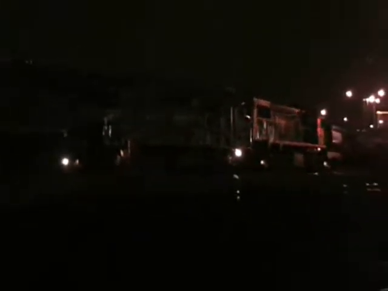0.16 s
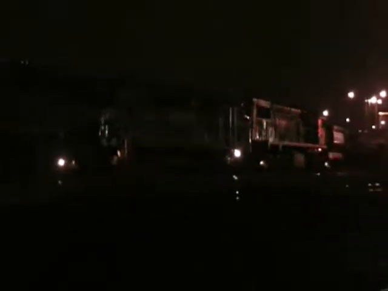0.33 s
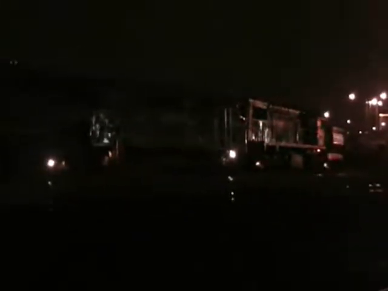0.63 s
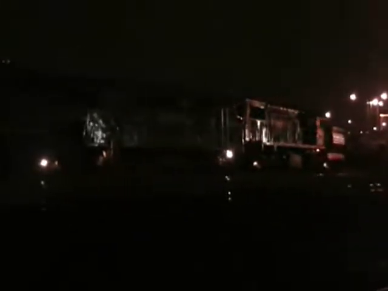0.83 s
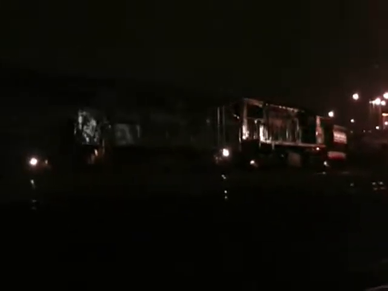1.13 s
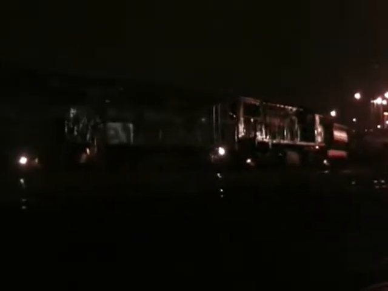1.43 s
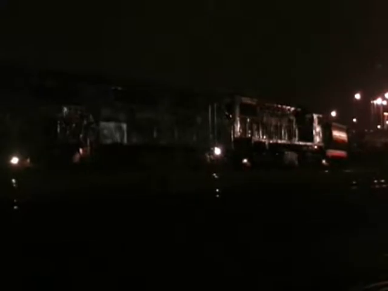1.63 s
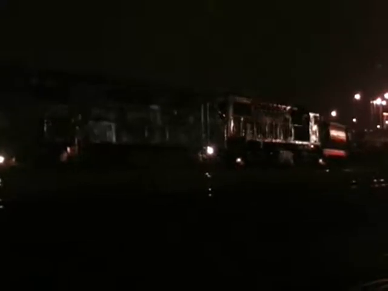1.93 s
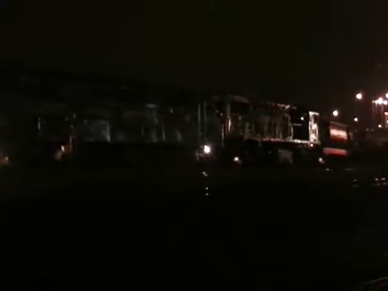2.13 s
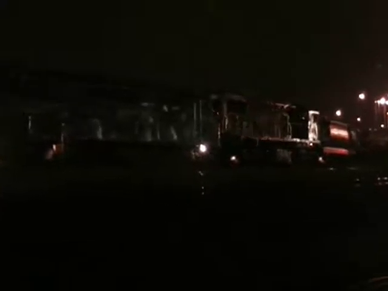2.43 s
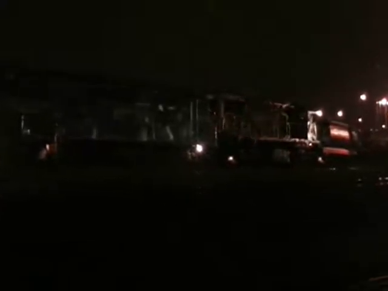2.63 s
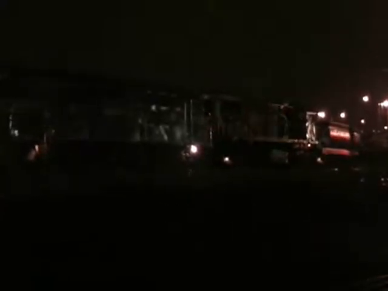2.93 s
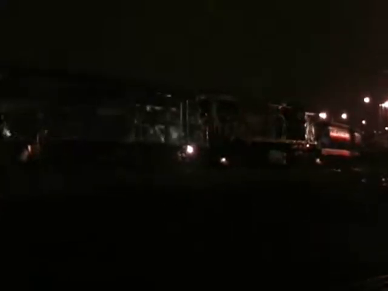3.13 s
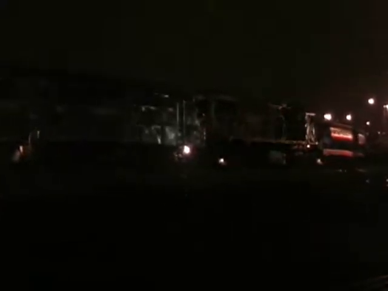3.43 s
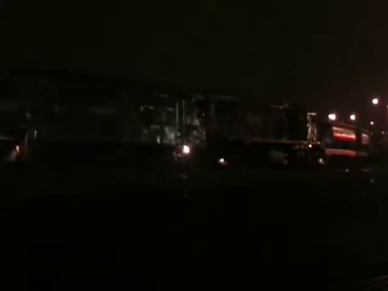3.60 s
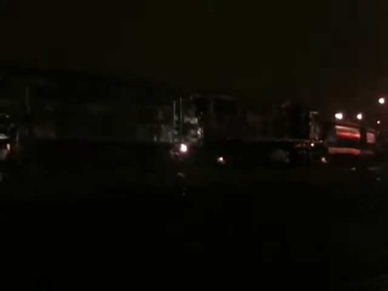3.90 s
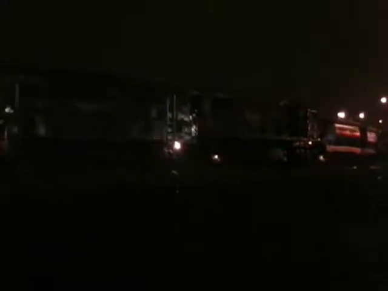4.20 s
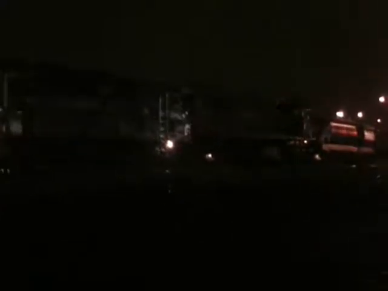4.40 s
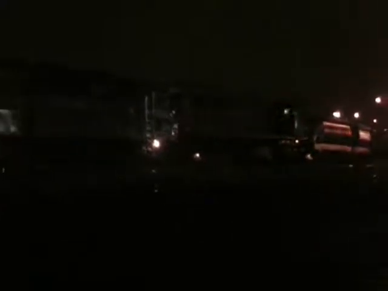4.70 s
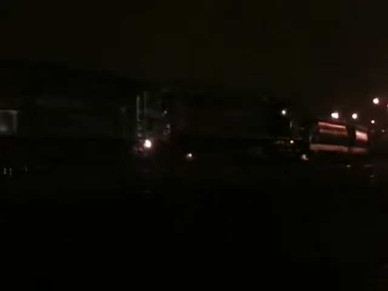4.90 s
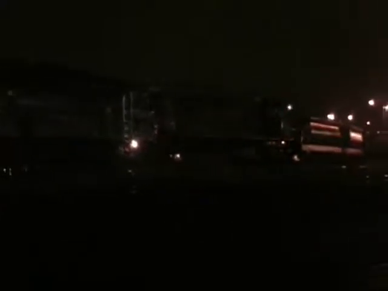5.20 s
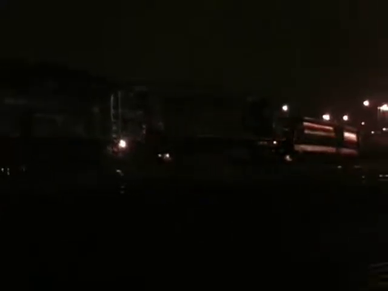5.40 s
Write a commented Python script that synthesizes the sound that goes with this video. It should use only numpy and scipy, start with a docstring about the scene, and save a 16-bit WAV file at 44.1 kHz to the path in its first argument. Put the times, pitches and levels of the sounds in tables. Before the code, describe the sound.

Two diesel locomotives idle then throttle up in a night yard, with rushing air hiss, rolling rumble and brief thin wheel squeals late on.

```python
"""A rail yard, where a freight train rolls slowly past two close microphone ports.
Two diesels idle, then speed up, the far one peaking first; both are sums of tones locked to a turning shaft.
The far one hums and whines; the near one throbs with pulses through a pipe, and its blower whistles.
Coloured noise makes the wheel rumble, the roar, the air hiss and the flange scrapes.
Short squeals are wheel rings driven by uneven slips."""
import sys
import numpy as np
from scipy import signal
from scipy.fft import rfft, irfft
from scipy.io import wavfile
from scipy.ndimage import uniform_filter1d

SR = 44100
rng = np.random.default_rng(int(sys.argv[2]) if len(sys.argv) > 2 else 0)


def inscribe(sig):
    """Save sig as 16-bit PCM at rate SR to the path in sys.argv[1].

    A 1-D sig is mono; a 2-D sig holds one channel per row.
    Samples are clipped to [-1, 1] before scaling.
    """
    pcm = np.round(np.clip(np.atleast_2d(sig).T, -1, 1) * 32767)
    wavfile.write(sys.argv[1], SR, pcm.astype(np.int16))


N = 244755
TIME = np.arange(N) / SR
HZ = np.fft.rfftfreq(N, 1 / SR)

# rolling rumble, and the roar of fans and engines: (frequency [Hz], relative level [dB])
RUMBLE_COLOUR = [(20, -39), (32, -20), (39, 0), (46, -3.5), (70, 3), (120, 0), (180, -2), (260, -0.5),
                 (350, -3), (450, -3.5), (560, -2), (700, -0.5), (850, -4.5), (1100, -11.5), (1800, -41.5),
                 (6000, -71)]
ROAR_COLOUR = [(500, -26.5), (800, -8.5), (1020, -1), (1200, -0.5), (1450, -4), (1720, -1.5), (2050, -3),
               (2500, -7.5), (3100, -10), (4000, -16), (6000, -25), (7600, -33.5), (9000, -29.5),
               (11000, -46)]
# the rumble grows a little as the train pulls
RUMBLE_DB, RUMBLE_PULL_DB = -19.5, 1.34
PULL_FROM_S, PULL_TO_S = 3.0, 3.4
# the roar grows, then eases
ROAR_IDLE_DB, ROAR_PEAK_DB, ROAR_SETTLED_DB = -26, -19.4, -21.5
ROAR_FROM_S, ROAR_TO_S, EASE_FROM_S, EASE_TO_S = 1.15, 2.6, 2.9, 3.35

# air hiss, and the faint fizz above it: (frequency [Hz], relative level [dB])
HISS_COLOUR = [(1500, -33), (2600, -12), (3300, 0), (4200, 3), (4800, 4), (5300, 1.5), (6000, -6.5),
               (6800, -14.5), (7600, -27), (8500, -20), (9400, -34.5), (10200, -47.5), (11000, -48)]
FIZZ_COLOUR = [(5500, -37), (7000, -5), (7600, -9), (8300, 0), (9400, -9.5), (10500, -23)]
HISS_IDLE_DB, HISS_LOADED_DB = -38, -33.5
FIZZ_IDLE_DB, FIZZ_LOADED_DB = -61.5, -52
# blasts of air on top of the hiss: (start [s], end [s], level [dB])
AIR_BLASTS = [(1.75, 2.02, -38), (2.017, 2.16, -30.5), (2.162, 2.271, -23.5), (2.27, 2.493, -26.5),
              (2.493, 3.064, -22.5), (3.06, 3.88, -31)]
VALVE_S = .045  # time a valve takes to open or close

# flange scrape colour: (frequency [Hz], relative level [dB])
SCRAPE_COLOUR = [(1200, -35), (2200, -1.5), (2850, -1), (3100, -1.5), (3350, 1), (3600, -5.5), (4200, -4.5),
                 (4700, -4.5), (5300, -7.5), (5800, -11.5), (6500, -16.5), (8500, -20), (10500, -35)]
# flange scrapes: (middle [s], length [s], level [dB])
SCRAPES = [(.69, 0.077, -35), (1.05, .08, -38), (1.5, .11, -34.5), (2.24, 0.19, -28), (3.437, 0.075, -28),
           (3.571, 0.11, -23.5), (4.31, 0.12, -28), (4.394, 0.041, -29.5), (4.495, 0.076, -25),
           (4.583, 0.079, -22.5), (4.668, 0.04, -24.5), (4.758, 0.075, -27.5), (4.878, 0.12, -25.5),
           (4.982, 0.11, -32.5), (5.107, 0.13, -28.5), (5.232, 0.13, -28), (5.46, 0.18, -29.5)]
# wheel squeals: (start [s], length [s], pitch at the bite [Hz], level [dB])
SQUEALS = [(4.264, 0.12, 3180, -31), (4.464, .06, 3385, -28.5), (4.558, .07, 3340, -24),
           (4.728, .065, 3260, -27.5), (4.823, .05, 3390, -29), (4.872, .06, 3110, -26.5),
           (4.93, .12, 3200, -29), (5.073, 0.12, 3180, -27.5), (5.195, .035, 3140, -31),
           (5.258, .04, 3320, -32), (5.387, .16, 3090, -31.5)]
# rings of the squealing wheel: (multiple of the squeal's pitch [ratio], level [dB])
WHEEL_RINGS = [(1, -.5), (1.33, -9), (1.62, -13), (1.95, -18)]
SQUEAL_HZ, SAG_S, BITE_S = 3125, .04, .008  # resting pitch, time to glide to it, attack
SLIP_HZ = 130  # how fast the slips vary

# governors: (idle, peak, settled [cycles/s], climb from, climb to, settle from, settle to [s])
FAR_GOVERNOR = (5.342, 6.9, 6.615, 1.83, 3.33, 3.5, 4.7)
NEAR_GOVERNOR = (5.11, 6.17, 6.06, 1.88, 4.9, 5.05, 5.8)
# the near engine takes up its load
IDLE_LOAD, FULL_LOAD = 0.069, 0.97  # share of the loaded pipe sound, 0-1
LOAD_FROM_S, LOAD_TO_S = 2.55, 3.05

# far engine's hum: (multiple of the cycle rate [ratio])
FAR_HUM = [16, 24, 40]
# far engine's gear whine: (multiple of the cycle rate [ratio]), then (level [dB]) for each
GEAR_ORDERS = [158, 190.4, 236.8, 277, 317]
GEAR_DB = [-3.5, -10, -1.5, -9, -6.5]
# the car body booms as the hum climbs through its resonances: (frequency [Hz], gain [dB])
BODY = [(85, -7), (115, -8), (128, 0), (136, -7), (160, -10), (212, -5), (223, 2), (237, 2), (255, -6)]
# the engine hood muffles and rings as the gear tones climb past: (frequency [Hz], gain [dB])
HOOD = [(800, -2), (845, 1), (875, 5), (920, 4), (985, 2.5), (1030, 3.5), (1060, 1), (1085, -5), (1255, 0),
        (1300, -7), (1500, -4), (1700, 2), (2100, 1.5)]
# the lowest gear tone rings out late on: (middle [s], length [s], level [dB])
GEAR_SWELLS = [(4.8, .44, -29.5), (5.3, .65, -38)]
# the hum dies away partway through the climb; hum and whine push harder under acceleration
HUM_IDLE_DB, HUM_FAST_DB, HUM_STRAIN_DB = -30.5, -47.5, 4.5
HUM_FADE_FROM_S, HUM_FADE_TO_S = 2.42, 2.75
WHINE_DB, WHINE_STRAIN_DB = -36.5, 7
CHATTER_DB = 1.5  # depth of the whine's chatter at full strain

# blower whistle
BLOWER_ORDER = 842  # multiple of the near engine's cycle rate
WHISTLE_IDLE_DB, WHISTLE_LOADED_DB = -44, -42
# the whistle swells now and then: (middle [s], length [s], level [dB])
WHISTLE_SWELLS = [(.56, .13, -41), (.69, .1, -34), (.93, .13, -39), (1.05, .11, -36), (1.32, .24, -36.5),
                  (1.52, .13, -27.5), (1.8, .14, -31.5), (1.93, .14, -30), (2.33, .22, -34),
                  (2.54, .2, -33), (3.75, .3, -37), (4.27, .083, -39), (5.47, .17, -45)]

# near engine's exhaust pipe, idling and under load: (frequency [Hz], relative level [dB])
PIPE_IDLE = [(30, -28), (45, -13), (60, -8), (68, -3), (80, -2), (95, 0), (110, -4), (170, 3), (300, 1.5),
             (600, -8), (1500, -35), (6000, -90)]
PIPE_LOADED = [(30, -20), (45, -6), (54, 0), (57.5, 1), (59.5, 6), (61.5, 1), (70, -7), (82, -.5),
               (98, 1.5), (110, .5), (135, -3), (230, 1), (500, -8), (1500, -35), (6000, -90)]
# near engine's exhaust: (time [s], level [dB])
EXHAUST_LEVEL = [(0.2, -27), (0.92, -26), (1.3, -29), (2.18, -27), (2.59, -27.5), (3.0, -24.5),
                 (3.45, -23.5), (3.98, -19.8), (4.6, -21.3), (5.4, -20.7)]
# near engine's throb: (multiple of the cycle rate [ratio]), then (relative level [dB]) for each
THROB_ORDERS = [9, 10, 11, 12, 13, 14, 15, 16, 17, 18, 19]
THROB_DB = [-2, -2, -5, -13, -5, -5, -3, 2, -3.5, -4, -14]
# the throb swoops down once a cycle: the top multiple peaks first, each lower one a little later
SWOOP_START, SWOOP_LAG = .74, .078  # shares of the cycle
# near engine's shaft and gear tones: (multiple of the cycle rate [ratio], relative level [dB])
NEAR_TONES = [(24, -15), (31, -18), (80, -16), (119, -14.5), (158, -13)]
TONES_IDLE_DB, TONES_LOADED_DB = -24, -21
# its lowest shaft tone drones late on: (middle [s], length [s], level [dB])
DRONE_SWELLS = [(5.29, 0.33, -28.5)]

# the two ports: (frequency [Hz], left lead [radians], left minus right [dB], likeness of diffuse sound [0-1])
PORTS = [(35, -1.6, 2.8, .86), (57, -1.45, 1.1, .85), (85, -1.16, -1.2, .8), (120, -.76, -2.9, .8),
         (170, -.36, -3.7, .87), (250, .06, -2.6, .96), (400, .1, -.2, .96), (700, -.08, 1.2, .95),
         (2100, -.32, .8, .91), (4500, -.69, -.9, .89), (5500, -.89, -2.3, .84), (7400, -2.1, -5, .4),
         (8500, -2.7, -2.4, .65), (10000, -3.2, -1.5, .65)]
EDGE_HZ = 10417  # top of the band


def gain_of(db):
    """Decibels to amplitude."""
    return 10 ** (np.asarray(db) / 20)


def evened(x):
    """Scales to rms 1."""
    return x / np.sqrt(np.mean(x ** 2) + 1e-20)


def curves(rows):
    """Each column of a time table, sample by sample."""
    s, *columns = np.transpose(rows)
    return [np.interp(TIME, s, c) for c in columns]


def read(rows, hz):
    """Each column of a frequency table, on a log axis."""
    f, *columns = np.transpose(rows)
    return [np.interp(np.log(hz + 1), np.log(f + 1), c) for c in columns]


def colour(x, spectrum):
    """Filters by a spectrum in dB."""
    return irfft(rfft(x) * gain_of(read(spectrum, HZ)[0]), N)


def ramp(start, end):
    """A smooth step from 0 to 1 between two times."""
    u = np.clip((TIME - start) / max(end - start, 1e-3), 0, 1)
    return u * u * (3 - 2 * u)


def swells(rows, order=4):
    """Bursts, one for each row of middle, length and level; a lower order gives softer shoulders."""
    return sum(gain_of(db) * np.exp(-abs(2 * (TIME - s) / length) ** order) for s, length, db in rows)


def governed(idle, peak, settled, climb_from, climb_to, settle_from, settle_to):
    """A speed or level that idles, climbs, overshoots and settles."""
    climb = (peak - idle) * ramp(climb_from, climb_to)
    return idle + climb + (settled - peak) * ramp(settle_from, settle_to)


def with_load(idle, loaded):
    """Moves from the idling value to the loaded one as the near engine takes up its load."""
    return idle + (loaded - idle) * ramp(LOAD_FROM_S, LOAD_TO_S)


def drift(rate_hz, size=1024):
    """Random wander of about rms 1, up to about the given rate."""
    coarse_s = np.linspace(0, N / SR, 4 * size)
    hz = np.fft.rfftfreq(len(coarse_s), coarse_s[1])
    spectrum = rfft(rng.standard_normal(len(coarse_s)))
    slow = irfft(spectrum * np.exp(-(hz / rate_hz) ** 2) * (hz > 0))
    return np.interp(TIME, coarse_s, evened(slow))


def noise(spectrum, patchy_db, size=1024):
    """Diffuse noise at both ports, partly alike, with drifting patches of colour."""
    hop = size // 4
    hz = np.fft.rfftfreq(size, 1 / SR)
    a, b, c, d, patches = rng.standard_normal((5, N // hop + 5, len(hz)))
    patches = uniform_filter1d(patches, size=18, axis=0)  # smooth in time
    patches = evened(uniform_filter1d(patches, size=4, axis=1))  # smooth in frequency
    same = np.clip(read(PORTS, hz)[2], 0, 1)
    left = a + 1j * b
    right = same * left + np.sqrt(1 - same ** 2) * (c + 1j * d)
    frames = np.array([left, right]) * gain_of(patchy_db * patches)
    x = signal.istft(frames.swapaxes(1, 2), nperseg=size, noverlap=size - hop)[1][:, :N]
    return evened(colour(x, spectrum))


def tone(turns, order, blur, fade_db):
    """One multiple of a shaft's rate; moving air and shifting echoes smear it and make it fade in and out."""
    phase = 2 * np.pi * order * turns + blur * drift(11.8)
    return np.sqrt(2) * np.sin(phase) * gain_of(fade_db * drift(6.7))


def rolling():
    """Wheels rumble on the rails under the roar of fans and engines, both as coloured noise."""
    rumble_db = RUMBLE_DB + RUMBLE_PULL_DB * ramp(PULL_FROM_S, PULL_TO_S)
    roar_db = governed(ROAR_IDLE_DB, ROAR_PEAK_DB, ROAR_SETTLED_DB,
                       ROAR_FROM_S, ROAR_TO_S, EASE_FROM_S, EASE_TO_S)
    rumble = gain_of(rumble_db + 0.085 * drift(5.0)) * noise(RUMBLE_COLOUR, patchy_db=1.17)
    roar = gain_of(roar_db + 0.36 * drift(30)) * noise(ROAR_COLOUR, patchy_db=1.7, size=2048)
    return rumble + roar


def air():
    """A sputtering hiss that follows the load, with blasts adding in power and a fizz above."""
    power = gain_of(with_load(HISS_IDLE_DB, HISS_LOADED_DB)) ** 2
    half = VALVE_S / 2
    for start, end, db in AIR_BLASTS:
        valve = ramp(start - half, start + half) - ramp(end - half, end + half)
        power = power + gain_of(db) ** 2 * np.maximum(valve, 0)
    sputter_db = .7 * drift(35) + 1.1 * drift(180)
    hiss = np.sqrt(power) * gain_of(sputter_db) * noise(HISS_COLOUR, patchy_db=2.2)
    fizz = gain_of(with_load(FIZZ_IDLE_DB, FIZZ_LOADED_DB)) * noise(FIZZ_COLOUR, patchy_db=1.5)
    return hiss + fizz


def flanges():
    """Short rubs of flange on rail, chattering in the wheel's ringing band."""
    return swells(SCRAPES) * gain_of(1.63 * drift(110)) * noise(SCRAPE_COLOUR, patchy_db=2.0)


def squeals():
    """Each time a flange bites, uneven slips shake the wheel's rings as the pitch glides to rest."""
    grip, hz = np.zeros(N), np.full(N, float(SQUEAL_HZ))
    for start, length, bite_hz, db in SQUEALS:
        age = TIME - start
        glide_hz = SQUEAL_HZ + (bite_hz - SQUEAL_HZ) * np.exp(-(age / SAG_S) ** 2)
        hz = np.where(age > 0, glide_hz, hz)
        release = 1 - ramp(start + length / 2, start + length)
        grip += gain_of(db) * ramp(start, start + BITE_S) * release
    angle = 2 * np.pi * np.cumsum(hz) / SR
    rings = np.zeros(N)
    for ratio, db in WHEEL_RINGS:
        # two independent wanders make a narrow band of noise around each ring
        shaken = drift(SLIP_HZ) * np.cos(ratio * angle) + drift(SLIP_HZ) * np.sin(ratio * angle)
        rings += gain_of(db) * shaken
    return grip * rings


def far_engine():
    """A low hum and a gear whine climb together, pushed and roughened while the engine strains to speed up."""
    speed = governed(*FAR_GOVERNOR)
    turns = np.cumsum(speed) / SR
    acceleration = np.maximum(np.gradient(speed), 0)
    strain = acceleration / acceleration.max()
    hum_fade_db = (HUM_FAST_DB - HUM_IDLE_DB) * ramp(HUM_FADE_FROM_S, HUM_FADE_TO_S)
    hum_db = HUM_IDLE_DB + HUM_STRAIN_DB * strain + hum_fade_db
    whine_db = WHINE_DB + WHINE_STRAIN_DB * strain
    hum, whine = np.zeros(N), np.zeros(N)
    for order in FAR_HUM:
        boom_db = read(BODY, order * speed)[0]
        hum += gain_of(hum_db + boom_db) * tone(turns, order, blur=.8, fade_db=2.5)
    for order, db in zip(GEAR_ORDERS, GEAR_DB):
        hood_db = read(HOOD, order * speed)[0]
        blur = order / 220 * (1 + .6 * strain)
        whine += gain_of(whine_db + db + hood_db) * tone(turns, order, blur=blur, fade_db=2)
    ringing = swells(GEAR_SWELLS) * tone(turns, GEAR_ORDERS[0], blur=.3, fade_db=1.5)
    chatter = gain_of(CHATTER_DB * strain * drift(30))
    return hum + whine * chatter + ringing


def blower():
    """Geared to the near engine, the whistle wavers once a cycle as the crankshaft speeds and slows."""
    speed = governed(*NEAR_GOVERNOR)
    turns = np.cumsum(speed) / SR
    flutter = .004 * np.cos(2 * np.pi * (turns - .8)) + .001 * drift(25)
    shaft = np.cumsum(speed * (1 + flutter)) / SR
    clean = tone(shaft, BLOWER_ORDER, blur=.2, fade_db=.6)
    breathy = tone(shaft, BLOWER_ORDER, blur=1.2, fade_db=.6) * drift(100)
    # a little breathy at first, then a cleaner note, then mostly broken up
    rough = .25 - .17 * ramp(1.05, 1.3) + .64 * ramp(2.0, 2.6)
    level = gain_of(with_load(WHISTLE_IDLE_DB, WHISTLE_LOADED_DB)) + swells(WHISTLE_SWELLS, order=3)
    return level * (np.sqrt(1 - rough) * clean + np.sqrt(rough) * breathy)


def near_engine():
    """Sixteen uneven exhaust beats and a swooping throb each cycle, through a pipe that booms under load."""
    turns = np.cumsum(governed(*NEAR_GOVERNOR)) / SR
    level_db = curves(EXHAUST_LEVEL)[0]
    load, tones_db = with_load(IDLE_LOAD, FULL_LOAD), with_load(TONES_IDLE_DB, TONES_LOADED_DB)

    firing = np.floor(16 * turns).astype(int)
    cylinder_db = 3 * rng.standard_normal(size=16)  # each cylinder keeps its own strength
    beat_db = cylinder_db[firing % len(cylinder_db)] + 2 * rng.standard_normal(N)
    beats = np.diff(firing, prepend=0) * gain_of(beat_db)
    beats = evened(beats - beats.mean())

    throb = np.zeros(N)
    for order, db in zip(THROB_ORDERS, THROB_DB):
        swoop = np.pi * SWOOP_LAG * (THROB_ORDERS[-1] - order) ** 2
        throb += gain_of(db) * np.cos(2 * np.pi * order * (turns - SWOOP_START) + swoop)

    drive = evened(throb) * gain_of(.5 * drift(7)) + gain_of(10) * beats
    idling, loaded = evened(colour(drive, PIPE_IDLE)), evened(colour(drive, PIPE_LOADED))
    exhaust = (1 - load) * idling + load * loaded
    gears = sum(gain_of(db) * tone(turns, round(order), blur=.8, fade_db=3.5) for order, db in NEAR_TONES)
    drone = swells(DRONE_SWELLS) * tone(turns, NEAR_TONES[0][0], blur=.3, fade_db=1.5)
    return gain_of(level_db) * exhaust + gain_of(tones_db) * gears + drone


def scene():
    """Engines and squeals come from one direction; rumble, roar, hiss and scrapes are more diffuse."""
    yard = rolling() + air() + flanges() + squeals() + far_engine() + blower() + near_engine()
    return yard * signal.windows.tukey(N, .001)  # very short fades at both ends


def record(dry):
    """The ports differ in phase and sensitivity; then the band limit."""
    lead, balance_db, _ = read(PORTS, np.fft.rfftfreq(2 * N, 1 / SR))
    side = np.array([[.5], [-.5]])  # left, right
    port_response = np.exp(1j * side * lead) * gain_of(side * balance_db)
    heard = irfft(rfft(dry, 2 * N) * port_response)[:, :N]
    lowpass = signal.firwin(511, EDGE_HZ, window=("kaiser", 9), fs=SR)
    return signal.oaconvolve(heard, lowpass[None], "same")


dry = scene()
out = record(dry)
inscribe(out)
```